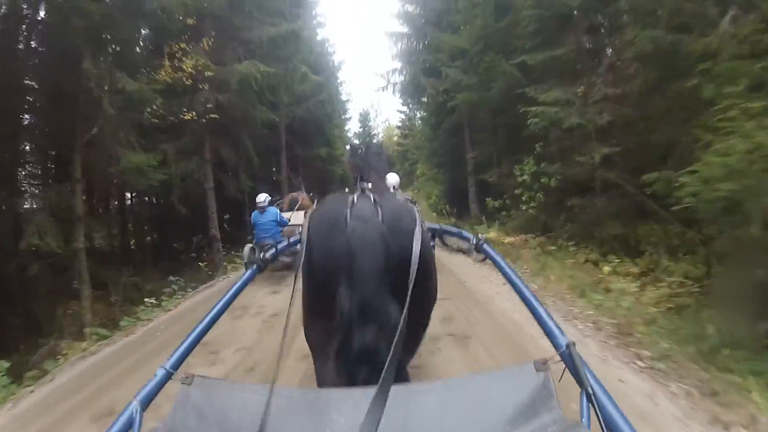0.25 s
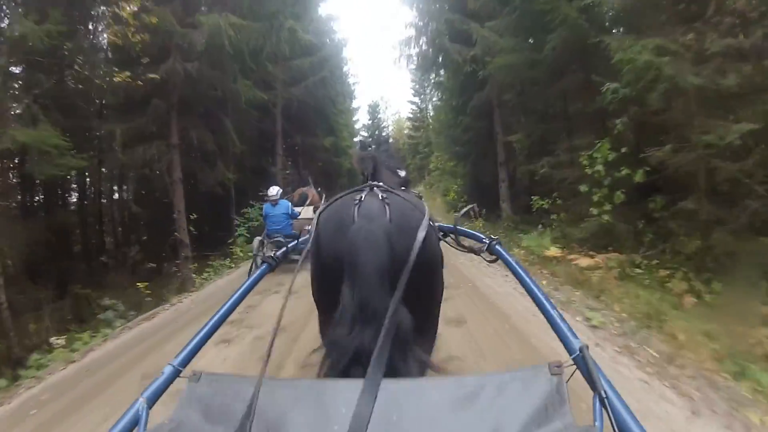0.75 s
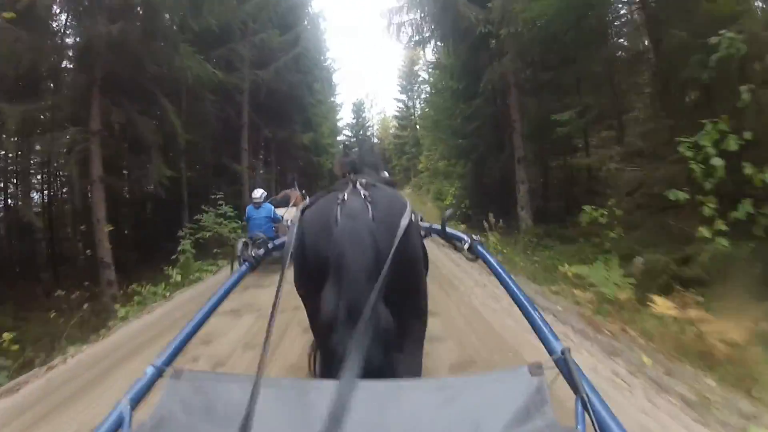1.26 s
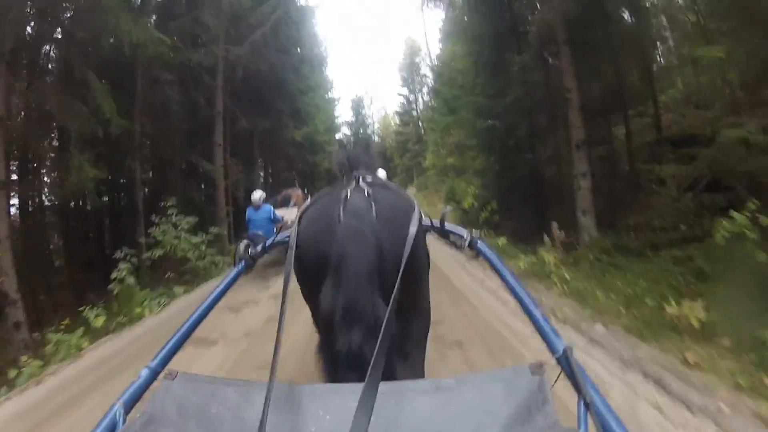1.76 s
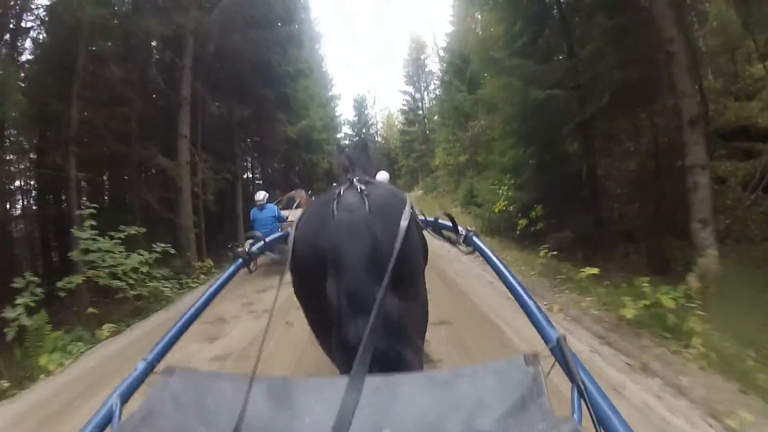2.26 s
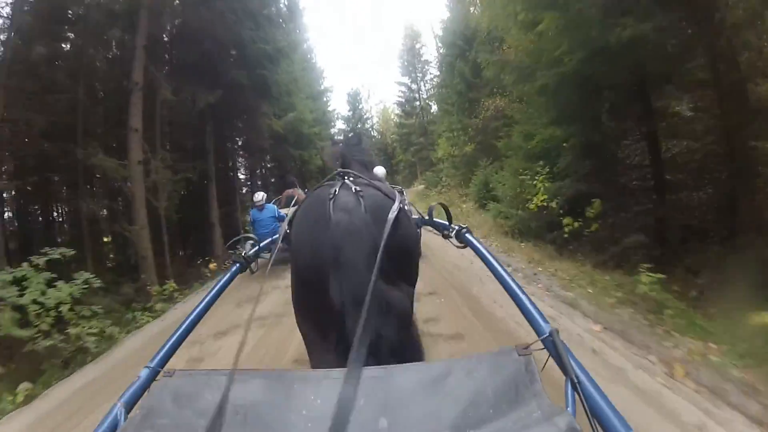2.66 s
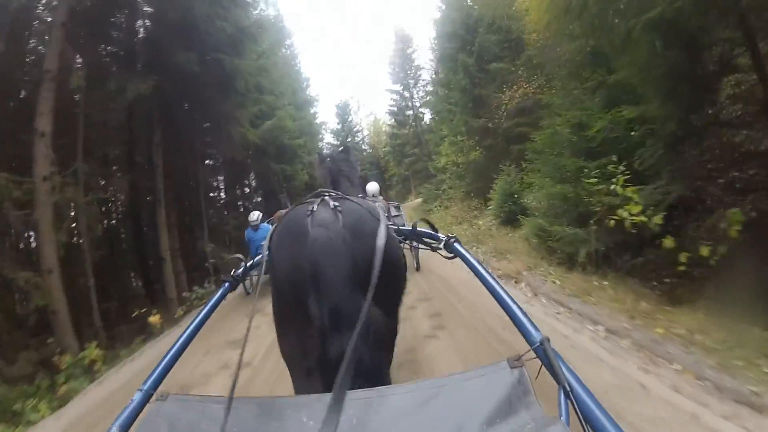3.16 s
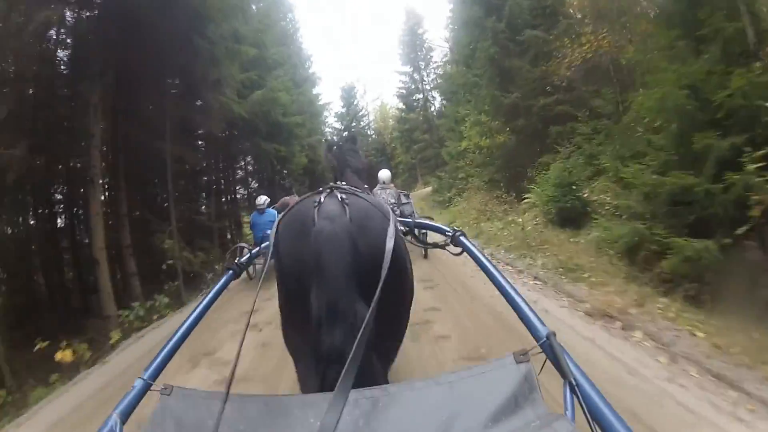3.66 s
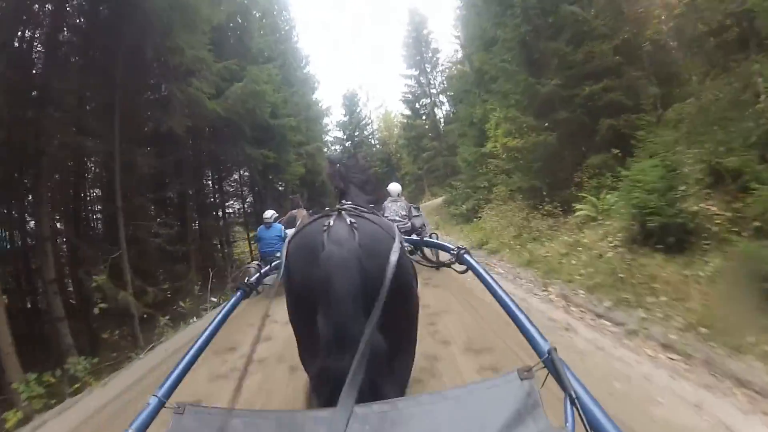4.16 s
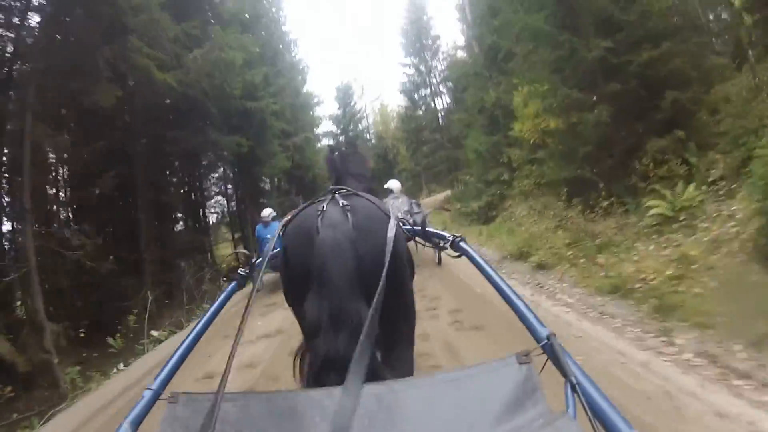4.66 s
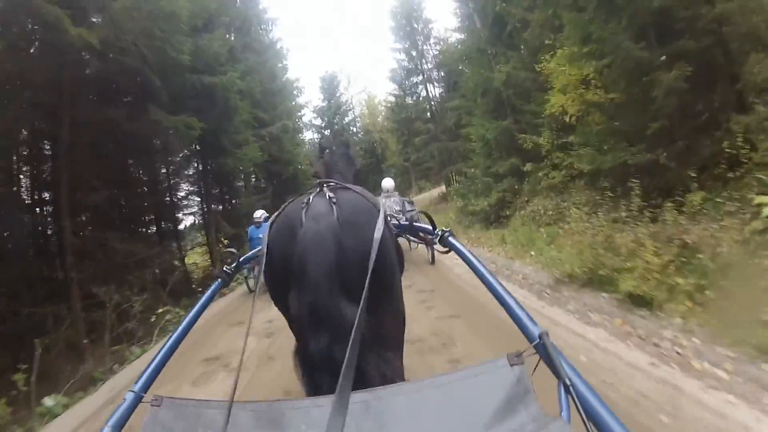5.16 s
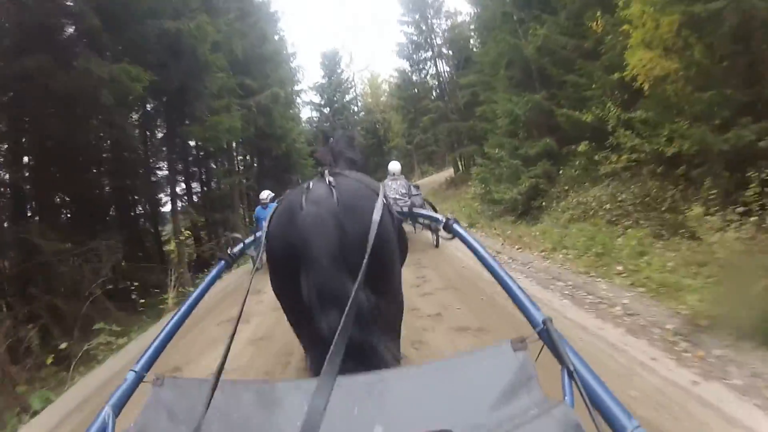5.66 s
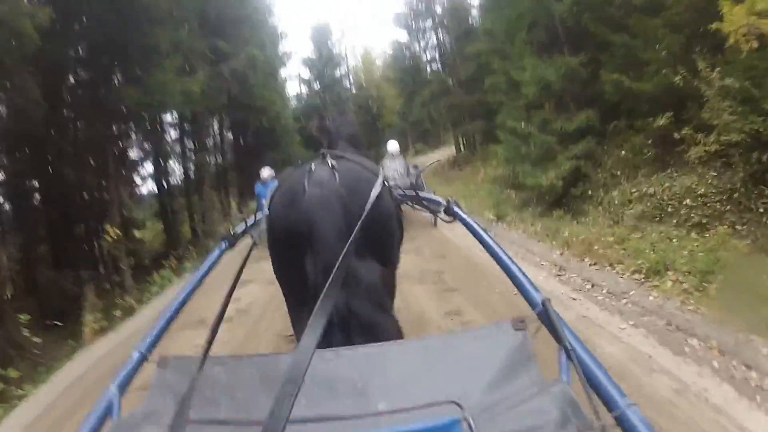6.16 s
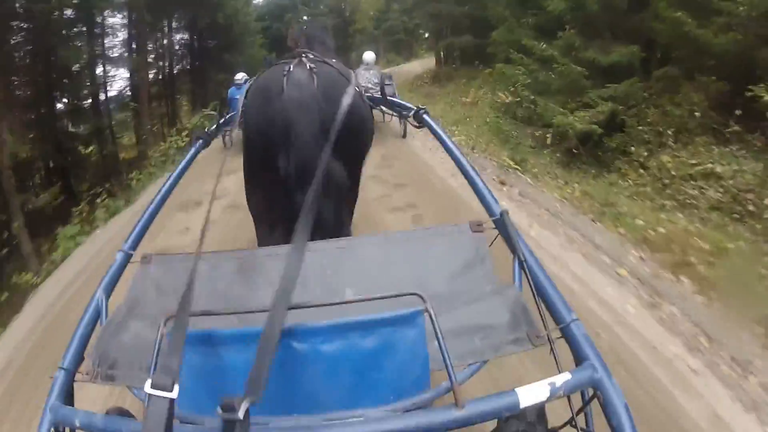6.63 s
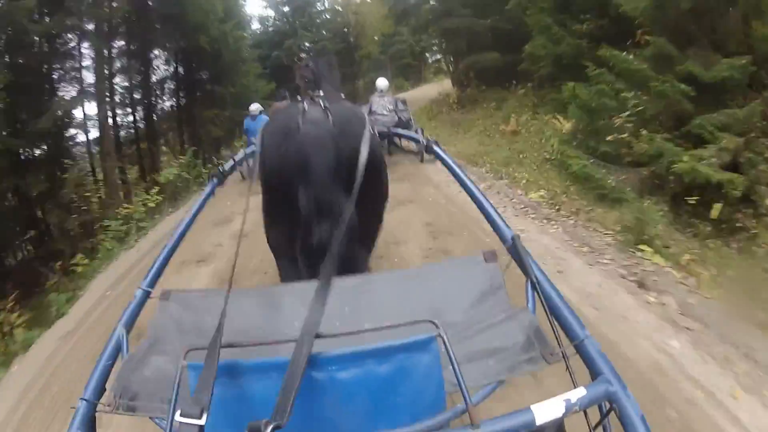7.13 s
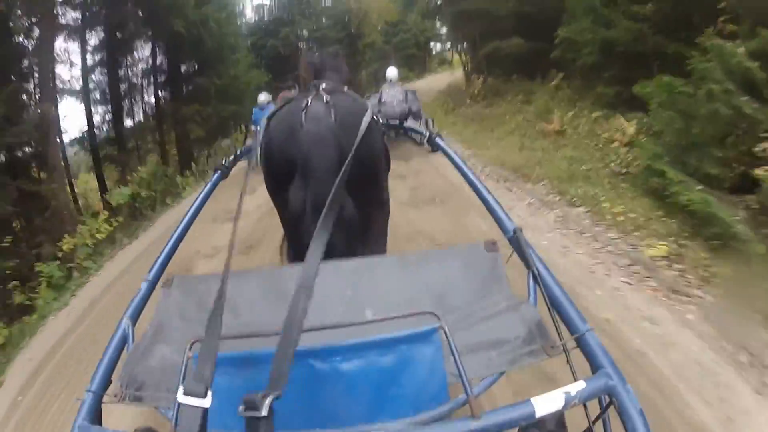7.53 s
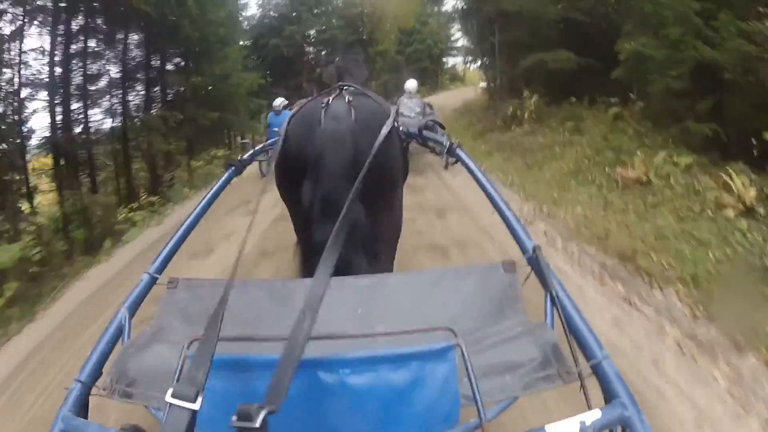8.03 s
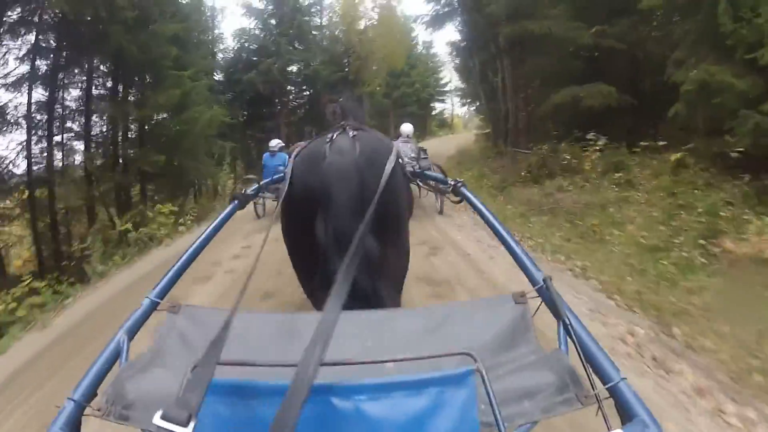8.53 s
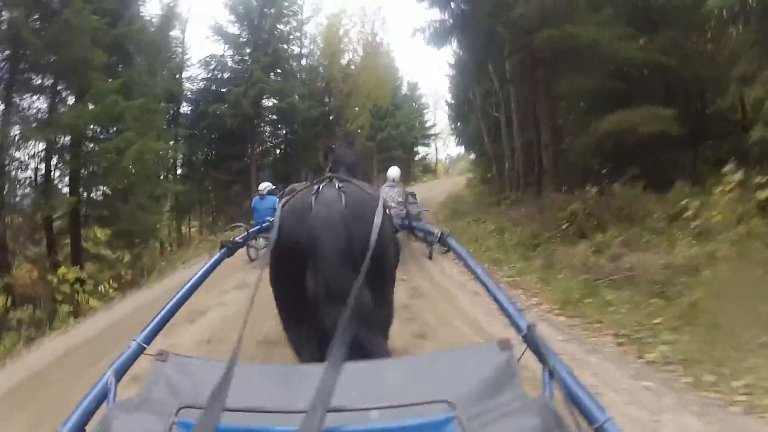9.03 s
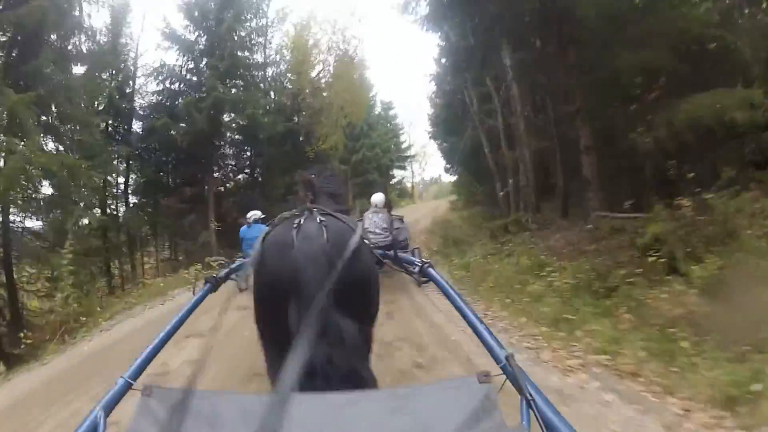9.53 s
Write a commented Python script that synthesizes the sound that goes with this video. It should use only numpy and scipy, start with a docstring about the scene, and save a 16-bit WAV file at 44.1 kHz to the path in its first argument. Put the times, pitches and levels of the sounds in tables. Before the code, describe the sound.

A light cart rattles along a gravel road behind a trotting horse, heard from inside a closed housing fixed to the cart, so everything is boxy and nearly mono. From the start, a loose frame joint clacks and chatters about four times a second, mixed with bright buckle ticks. Underneath run a low wheel rumble and faint, gritty hoof scuffs. Hollow knocks join in between about 1.5 and 3.7 seconds. At 6.2 seconds the ride gets rougher and something rubs and bumps against the housing, with a loud double knock around 6.4 and smaller thumps until 7. The clacks then become sparser. From about 8 seconds, short rubbing strokes return, with the hardest knock at 8.5. Scraping, soft bumps and a few clacks continue over the rumble until the end, near 10 seconds.

```python
"""On a gravel road, a horse trots with a light cart, heard from inside a closed housing fixed to the cart.
Loose parts of the frame clack, knock and tick with the stride. Under them the wheels rumble and the
hooves scuff faintly in the gravel. In two spells, something rubs and bumps against the housing.
Its shell colours every sound and makes left and right nearly the same."""
import sys
import numpy as np
from scipy import signal
from scipy.fft import rfft, irfft, next_fast_len
from scipy.io import wavfile
from scipy.ndimage import uniform_filter1d, minimum_filter1d

SR = 44100
rng = np.random.default_rng(int(sys.argv[2]) if len(sys.argv) > 2 else 0)


def wav_out(sig):
    """Save sig, one row per channel (or a flat mono array), as 16-bit PCM at SR to the path in sys.argv[1]."""
    wavfile.write(sys.argv[1], SR, np.round(np.clip(np.atleast_2d(sig).T, -1, 1) * 32767).astype(np.int16))


N = 431738
TIME = np.arange(N) / SR
FFT_SIZE = next_fast_len(N)
FREQS = np.fft.rfftfreq(FFT_SIZE, 1 / SR) + 1e-3

# Levels in the tables are relative. A ring_s is the time a tone takes to fade by 60 dB.
# Tone of the faint hiss that differs between left and right: pitch_hz, level_db
SIDE_HISS_TONE = [(18, -35), (30, -27), (129, 0), (680, -6.5), (754, -9.5), (2030, -22), (4540, -12),
                  (5880, -18.5), (9890, -19.5), (11600, -56), (15000, -3.5)]
# The wheels' ride, rougher after six seconds: time_s, shake_db, rumble_db
RIDE = [(0.0, -56.5, -58.5), (2.04, -58.5, -60), (2.4, -56, -59), (2.86, -60, -58.5), (5.34, -59, -62.5),
        (5.62, -64.5, -58.5), (6.11, -57.5, -60), (6.38, -51.5, -50.5), (6.95, -52, -59), (7.66, -53, -59),
        (8.56, -52.5, -52), (8.92, -59.5, -58), (9.3, -53, -57), (9.79, -55.5, -58)]
# Tones of the shaking frame, the drumming tyres and the gravel under them: pitch_hz, level_db
SHAKE_TONE = [(12, -1), (28, 4.5), (55, -6), (90, -13.5), (140, -23), (300, -45)]
RUMBLE_TONE = [(40, -4.5), (100, 2), (150, 1), (215, 1), (300, -7), (420, -9.5), (600, -15.5),
               (1000, -25.5), (2000, -32.5)]
GRAVEL_TONE = [(300, -8.5), (950, -7.5), (1250, -3), (1800, -2.5), (2150, 2), (2520, -3), (2750, -7),
               (3400, -7), (4300, -10.5), (8800, -19), (9700, -14.5), (11200, -23), (14300, -19),
               (16000, -43)]
# The clearest scuffs of the hooves: start_s, crunch_db, grit_db
HOOF_SCUFFS = [(0.059,-45,-62), (.095,-47.5,-56.5), (0.44,-46,-53), (0.614,-47,-47), (.645,-53,-68),
               (0.713,-49,-53), (0.772,-45.5,-45.5), (1.224,-46.5,-56), (1.319,-52,-47), (1.488,-45,-68),
               (1.605,-59,-48.5), (1.812,-57.5,-57), (1.88,-49,-58), (2.18,-48,-55), (2.351,-48,-72),
               (2.703,-47,-60), (2.888,-51.5,-56.5), (3.22,-48,-51.5), (3.273,-52,-57), (3.56,-47.5,-56),
               (3.792,-43,-52), (3.828,-46.5,-51), (4.097,-48.5,-56), (4.684,-42,-52), (4.924,-49,-51),
               (4.972,-51.5,-50.5), (5.03,-41.5,-56), (5.231,-51,-51.5), (5.793,-47,-52), (5.824,-47,-66),
               (5.881,-56,-52), (6.078,-41.5,-45), (6.158,-38,-54), (6.971,-50.5,-53), (7.271,-47.5,-50),
               (7.585,-49,-52), (7.808,-50,-53), (7.844,-46,-48.5), (8.098,-50,-53), (8.362,-54,-56),
               (8.91,-50,-57), (8.966,-46,-55), (9.033,-44,-46), (9.255,-46,-49)]
# Bands in which crushed gravel rings: pitch_hz, width_hz, level_db
CRUNCH_BANDS = [(1170, 150, -10.5), (1660, 200, -4.5), (2070, 230, -2), (2290, 130, 2), (2290, 73, 0),
                (3290, 640, -12.5), (9720, 520, -12), (14160, 430, -14)]
# Tone of the fine grit under a hoof: pitch_hz, level_db
GRIT_TONE = [(1500, -27), (2400, -10), (2800, -5), (3400, 7), (4300, 12.5), (5200, 7.5), (6800, 8),
             (8300, 4), (9000, -22), (9800, -11), (11000, -23), (14300, -18), (16000, -23)]
# Lingering rings of frame and harness: start_s, level_db, pitch_hz, ring_s
FRAME_RINGS = [(5.585,-58,1534,0.54), (6.424,-28,230,0.037), (6.461,-22.5,222,0.049),
               (7.506,-43,3370,0.059), (8.52,-18.5,180,0.085), (8.524,-26,226,0.058), (8.525,-37,610,0.053),
               (8.525,-38,780,0.054), (8.525,-43.5,1000,0.21)]
# Soft bumps through the frame: start_s, level_db, pitch_hz
FRAME_BUMPS = [(6.21,-22,137), (6.229,-28,134), (6.338,-30.5,98), (6.39,-30.5,120), (6.423,-11.5,165),
               (6.456,-18,114), (6.641,-31.5,155), (6.942,-24,171), (7.233,-35,165), (7.608,-29.5,145),
               (8.015,-30,116), (8.38,-30,99), (8.592,-38,150), (8.716,-26,114), (9.341,-36,126),
               (9.441,-31.5,129), (9.517,-37.5,85)]
# Strokes of rubbing on the housing: start_s, length_s, final_level_db
RUB_STROKES = [(6.187,0.292,-40), (6.49,0.048,-51), (6.554,0.047,-43.5), (6.622,0.069,-47),
               (6.735,0.066,-52), (6.892,0.14,-55.5), (7.995,0.22,-52), (8.243,0.085,-38), (8.374,.11,-35),
               (8.484,0.042,-29.5), (8.584,0.057,-42), (8.666,0.15,-38.5), (8.84,0.062,-50.5),
               (8.985,0.013,-37), (9.023,0.051,-43), (9.1,0.048,-42), (9.17,0.044,-40), (9.245,0.086,-53.5),
               (9.373,0.043,-39), (9.438,0.061,-42.5), (9.51,0.051,-40), (9.698,0.058,-42)]
# Bands in which the rubbed housing rings: pitch_hz, width_hz, level_db
RUB_BANDS = [(184, 55, -0.5), (650, 220, -19.5), (1196, 110, -3.5), (1350, 83, -6.5), (1720, 140, -2),
             (1980, 200, -2), (2000, 280, 1), (2390, 120, -5.5), (3070, 154, -9), (3610, 244, -9),
             (4750, 1200, -24), (8570, 600, -17), (10030, 380, -10.5), (10450, 250, -21), (13940, 580, -14)]
# Blows on the housing: start_s, level_db, ring_factor, brightness_db_per_octave
HOUSING_BLOWS = [(6.2,-20,0.78,-5), (6.2297,-20,0.84,-4), (6.2818,-29.5,2.2,2), (6.4238,-3,1,0),
                 (6.4596,-1.5,0.55,-2.5), (6.55,-10.5,1.56,1), (6.619,-28.5,.93,-6), (6.6442,-20,0.89,-2),
                 (6.678,-17.5,1.6,4), (6.6856,-16.5,1.2,5), (6.9419,-20,0.61,-7.5), (7.2358,-28,0.68,-3.5),
                 (7.6095,-30,1.6,4), (7.952,-23.5,1.4,-2), (8.5186,-10,1.7,-1.5), (8.5239,4.5,1.27,-1),
                 (8.5291,-12.5,1.3,-3), (8.535,-10,0.77,-2), (8.538,-14.5,1.2,2)]
# Knocks of a hollow part beside the housing: start_s, level_db
HOLLOW_KNOCKS = [(0.736,-43), (1.4977,-28), (1.5685,-44), (1.7168,-23.5), (1.9956,-41), (2.1566,-29),
                 (2.274,-30.5), (2.9862,-24), (3.102,-39.5), (3.3931,-29.5), (3.5833,-24.5), (3.7065,-33.5),
                 (5.8953,-35.5), (6.678,-23), (8.997,-46)]
# Ticks of a small buckle: start_s, level_db, bounce_db (compared with the tick)
BUCKLE_TICKS = [(.141,-25.5,-5), (.362,-26.5,-2), (.9305,-27.5,1.5), (1.2107,-31.5,-15), (1.7425,-27.5,-12),
                (2.168,-36.5,-15), (2.2883,-32,-31), (2.4098,-35.5,6.5), (2.616,-30.5,-3.5),
                (2.7442,-35,-30), (2.9654,-28,-6), (3.4176,-28.5,-21), (3.5313,-31,-10), (4.6225,-28,-12),
                (5.4757,-32.5,-17), (5.7891,-31,-9), (6.077,-27.5,-6), (6.211,-32,-21), (7.081,-31,-10),
                (7.46,-30,1)]
# Clacks of a loose joint in the frame: start_s, level_db, bounce_gap_s (2 ms or less: no bounce)
JOINT_CLACKS = [(0.2033,-20.5,0.014), (0.4995,-28,0.011), (0.7276,-28,0.014), (0.811,-27.5,0.012),
                (1.039,-30,0), (1.1188,-27.5,.007), (1.3741,-20,.012), (1.515,-30.5,0.008),
                (1.5875,-20,0.016), (1.918,-26,0.012), (2.1317,-27.5,0.0044), (2.2133,-22.5,.011),
                (2.3205,-20.5,.014), (2.5303,-25,0.012), (2.6816,-27,0.0066), (2.778,-21,0.012),
                (2.975,-29,.0056), (3.047,-32,0.0051), (3.4715,-24.5,.017), (3.6467,-28,0.0096),
                (3.8541,-25.5,0.011), (4.146,-26.5,.011), (4.4006,-25.5,.01), (4.696,-22,.017),
                (5.0465,-32,0.0099), (5.3122,-28,.011), (5.6663,-25,0.015), (6.0008,-26.5,0.012),
                (6.1672,-25,0), (6.3435,-27.5,0.021), (6.393,-23,0), (6.4231,-13,0.0014),
                (7.0556,-25.5,0.0019), (7.439,-26.5,0.0014), (9.0598,-23,0.017), (9.278,-28,0.015),
                (9.5356,-23,0.012), (9.681,-38,0.013)]
# Each part's natural tones (modes), which every hit varies: pitch_hz, level_db, ring_s
HOUSING_MODES = [(196, -16.5, 0.021), (715, -15.5, 0.0043), (1199, -4.5, 0.015), (1530, 4, 0.0036),
                 (1844, 0.5, 0.0092), (2260, -13.5, 0.0084), (2600, -32.5, 0.01), (3100, -23, 0.013),
                 (10080, -14, 0.01), (10780, -18.5, 0.013), (13600, -17, 0.015)]
HOLLOW_MODES = [(224.6,-13,0.015), (860,-43,0.0016), (1190,-2,0.021), (1877,14,0.019), (1843,14,0.011),
                (10150,-9,0.03), (10630,-10,.013), (13700,-10.5,0.033)]
BUCKLE_MODES = [(255, -6.5, 0.011), (1460, -11, 0.01), (1920, -9, 0.0146), (2240, 0.5, 0.0036),
                (3340, 0.3, 0.0064), (3800, -0.5, 0.002), (4380, -15.5, 0.012), (8630, -9.5, 0.0084),
                (10150, -17, 0.0091), (14300, -4.5, 0.0011)]
JOINT_MODES = [(240, -10.5, 0.014), (1283, -8.5, 0.014), (1562, -8.5, 0.014), (2218, -1.5, 0.011),
               (2533, -7.5, 0.026), (2910, -8, 0.0045), (3444, -7.5, 0.0074), (4930, -10.5, 0.0023),
               (8650, -10, 0.004), (9696, -15, 0.019), (10450, -13, 0.0038), (14330, -13.5, 0.014)]
# Treble bands that the housing's shell swallows: pitch_hz, width_hz, gain_db
SHELL_DIPS = [(5960, 272, -15.5), (12060, 1320, -10.5)]


def gain(db):
    """Turn decibels into a number to multiply by."""
    return 10 ** (np.asarray(db) / 20)


def add(track, start_s, sound):
    """Mix a sound into a track at a given time."""
    i = max(int(start_s * SR), 0)
    track[i:i + len(sound)] += sound[:max(N - i, 0)]


def wander(per_s):
    """A smooth random drift, about 1 in size."""
    step = max(int(SR / per_s), 2)
    drift = uniform_filter1d(np.repeat(rng.standard_normal(N // step + 1), step), step)[:N]
    return drift / np.std(drift)


def grains(per_s, spread_db):
    """Tiny hits of uneven size at random times."""
    size = gain(spread_db * np.minimum(rng.exponential(size=N), 5))
    return (rng.random(N) < per_s / SR) * rng.standard_normal(N) * size


def colour(sound, tone):
    """Shape a sound's lows and highs by a tone table; the result has strength 1."""
    hz, db = np.transpose(tone)
    shape = gain(np.interp(np.log(FREQS), np.log(hz), db))
    shaped = irfft(rfft(sound, FFT_SIZE) * shape, FFT_SIZE)[:N]
    return shaped / np.std(shaped)


def resonate(sound, bands):
    """Let a sound ring in a few bands of pitch; the result has strength 1."""
    power = sum(gain(db) ** 2 / (1 + ((FREQS - hz) / width) ** 2) ** 2 for hz, width, db in bands)
    ringing = irfft(rfft(sound, FFT_SIZE) * np.sqrt(power), FFT_SIZE)[:N]
    return ringing / np.std(ringing)


def strike(modes, ring_factor=1, brightness=0, detune=0.0074, uneven_db=0):
    """One hit sets a part's natural tones ringing, and each fades at its own speed."""
    t = np.arange(SR // 20) / SR
    hz, db, ring_s = np.transpose(modes)[:, :, None]
    db = db + brightness * np.log2(np.clip(hz, 1000, 3000) / 1800)
    db = db + uneven_db * rng.standard_normal(hz.shape)  # the point of contact shifts
    sign = (-1) ** np.arange(len(hz))[:, None]  # neighbours start opposite ways, so the ring builds up
    tuning = 1 + detune * rng.standard_normal()
    fade = np.exp(-np.log(1000) * t / (ring_s * ring_factor))
    return np.sum(sign * gain(db) * np.sin(2 * np.pi * hz * tuning * t) * fade, axis=0)


def side_noise(hiss_db=-71, rumble_db=-72, waver_db=4):
    """A faint, wavering hiss and low rumble that differ between left and right."""
    hiss = gain(hiss_db) * colour(rng.standard_normal(N), SIDE_HISS_TONE)
    rumble = gain(rumble_db) * colour(rng.standard_normal(N), SHAKE_TONE)
    return (hiss + rumble) * gain(waver_db * wander(40))


def pebbles(per_s=22, level_db=-68):
    """Single small stones crack under the tyres."""
    return gain(level_db) * resonate(grains(per_s, 1.0), CRUNCH_BANDS)


def wheels(shake_db=3.5, rumble_db=1, grind_db=-62, sway_db=2.5, jolt_db=2, patchy_db=1.0):
    """Tyres shake the frame, drum over stones and grind on gravel, all harder where the road is rough."""
    times, shakes, rumbles = np.transpose(RIDE)
    shaking_db = np.interp(TIME, times, shakes) + shake_db
    drumming_db = np.interp(TIME, times, rumbles) + rumble_db
    grinding_db = grind_db + 0.33 * (drumming_db - np.median(drumming_db))  # gently follows the rumble
    shake = colour(rng.standard_normal(N), SHAKE_TONE) * gain(shaking_db + sway_db * wander(11))
    rumble = colour(grains(1500, 0.67), RUMBLE_TONE) * gain(drumming_db + jolt_db * wander(25))
    grind = colour(grains(6000, 1.0), GRAVEL_TONE) * gain(grinding_db + patchy_db * wander(40))
    return shake + rumble + grind


def hooves(crunch_db=-1, grit_db=-2, rise_s=0.0074, faint_per_s=2, uneven_db=3):
    """Each hoof crushes a short burst of gravel; fainter scuffs fall at random among the clear ones."""
    crunch, grit, t = np.zeros(N), np.zeros(N), np.arange(SR // 8) / SR
    swell = t / rise_s * np.exp(1 - t / rise_s)
    dice = rng.random((int(faint_per_s * N / SR), 3))
    faint_scuffs = [(when * N / SR, -62 + uneven_db * (2 * low - 1), -61.5 + uneven_db * (2 * high - 1))
                    for when, low, high in dice]
    for start_s, low_db, high_db in HOOF_SCUFFS + faint_scuffs:
        add(crunch, start_s, gain(low_db + crunch_db) * swell)
        add(grit, start_s, gain(high_db + grit_db) * swell)
    crunch *= resonate(grains(3000, 0.79), CRUNCH_BANDS)
    grit *= colour(grains(3500, 0.71), GRIT_TONE)
    return crunch + grit


def frame_rings():
    """Struck parts of the frame and harness ring on, each at one pitch."""
    out, t = np.zeros(N), np.arange(SR // 2) / SR
    for start_s, db, hz, ring_s in FRAME_RINGS:
        fade = np.exp(-np.log(1000) * t / ring_s)
        add(out, start_s, gain(db) * np.sin(2 * np.pi * hz * t) * fade)
    return out


def frame_bumps(rise_cycles=0.44):
    """A soft push swings the frame back and forth about twice."""
    out, t = np.zeros(N), np.arange(SR // 12) / SR
    for start_s, db, hz in FRAME_BUMPS:
        age = t * hz / rise_cycles
        swell = age ** 2 * np.exp(2 * (1 - age))
        add(out, start_s, -gain(db) * swell * np.sin(2 * np.pi * hz * t))
    return out


def housing_rubs(level_db=-2, catch_db=1.8, grip_s=0.019, release_s=0.012, swell_db_per_s=16.5):
    """Each stroke takes hold, presses ever harder and lets go; its many tiny slips ring the shell."""
    pressure, t = np.zeros(N), np.arange(SR // 2) / SR
    for start_s, length_s, db in RUB_STROKES:
        grip = np.minimum(t / grip_s, 1)
        press = gain(db + swell_db_per_s * np.minimum(t - length_s, 0))
        release = np.exp(-np.maximum(t - length_s, 0) / release_s)
        add(pressure, start_s, grip * press * release)
    slips = resonate(grains(14000, 0.93), RUB_BANDS)
    return pressure * slips * gain(level_db + catch_db * wander(170))


def housing_blows():
    """Blows land straight on the housing and die away quickly."""
    out = np.zeros(N)
    for start_s, db, ring_factor, brightness in HOUSING_BLOWS:
        blow = strike(HOUSING_MODES, ring_factor, brightness, detune=0.013, uneven_db=1.5)
        add(out, start_s, gain(db) * blow)
    return out


def hollow_knocks():
    """A hollow part is knocked, always on the same spot."""
    out = np.zeros(N)
    for start_s, db in HOLLOW_KNOCKS:
        add(out, start_s, gain(db) * strike(HOLLOW_MODES, ring_factor=0.99, brightness=-1, detune=0.027))
    return out


def buckle_ticks(bounce_s=0.0038):
    """A small buckle hits with a bright tick and bounces once."""
    out = np.zeros(N)
    for start_s, db, bounce_db in BUCKLE_TICKS:
        add(out, start_s, gain(db) * strike(BUCKLE_MODES, detune=0.012))
        add(out, start_s + bounce_s, gain(db + bounce_db) * strike(BUCKLE_MODES, detune=0.15))
    return out


def joint_clacks(gap_shrink=0.41, first_loss_db=4.5, next_loss_db=6.5, usual_db=-24):
    """The loose joint hits its stop and chatters: each bounce comes sooner and weaker."""
    out = np.zeros(N)
    for time_s, db, gap_s in JOINT_CLACKS:
        add(out, time_s, gain(db) * strike(JOINT_MODES, uneven_db=1.8))
        bounce_db = db - first_loss_db - 0.81 * max(db - usual_db, 0)  # hard clacks lose the most
        if gap_s > 0.002:
            for k in range(4):
                time_s += gap_s * gap_shrink ** k
                bounce = strike(JOINT_MODES, detune=0.017, uneven_db=2.0)
                add(out, time_s, gain(bounce_db - k * next_loss_db) * bounce)
    return out


def scene(leak_db=-39, leak_delay_s=0.0012):
    """Nearly all sound comes through the frame, the same on the left and the right."""
    rattle = joint_clacks() + buckle_ticks()
    hits = rattle + hollow_knocks() + housing_blows() + frame_bumps() + frame_rings()
    centre = hits + hooves() + wheels() + pebbles() + housing_rubs()
    side = side_noise()
    # a trace of the rattle reaches the two microphone openings unequally, a little later
    add(side, leak_delay_s, gain(leak_db) * rattle)
    return np.array([centre + side, centre - side])


def record(dry, ripple_db=2.56, ripple_hz=130, peak_limit=0.8, top_hz=15450):
    """The shell swallows two treble bands; then loud peaks are turned down and the very top is cut."""
    dips_db = sum(db * np.exp(-((FREQS - hz) / width) ** 2) for hz, width, db in SHELL_DIPS)
    # the shell's many small resonances make the treble uneven
    ripple = np.interp(FREQS / ripple_hz, np.arange(512), rng.standard_normal(512))
    treble = np.clip(FREQS / 2000 - 1, 0, 1)
    shell = gain(dips_db + ripple_db * ripple * treble)
    housed = irfft(rfft(dry, FFT_SIZE) * shell, FFT_SIZE)[:, :N]
    safe_gain = np.minimum(1, peak_limit / (np.abs(housed).max(axis=0) + 1e-9))
    limited = housed * uniform_filter1d(minimum_filter1d(safe_gain, size=89), size=89)  # eased over 2 ms
    top_cut = signal.ellip(8, 0.2, 70, top_hz, fs=SR, output="sos")
    return signal.sosfilt(top_cut, limited)


dry = scene()
out = record(dry)
wav_out(out)
```